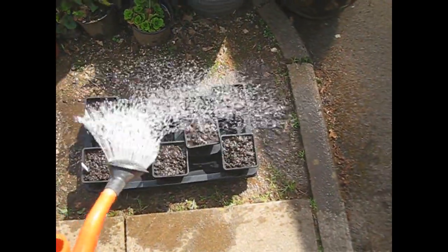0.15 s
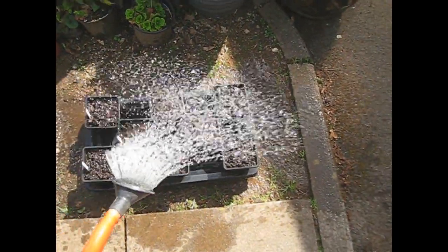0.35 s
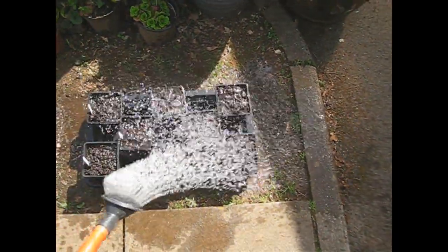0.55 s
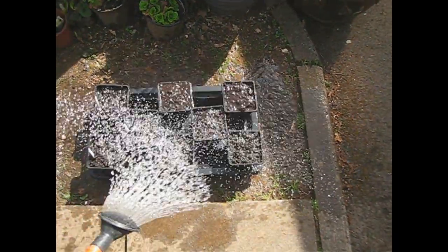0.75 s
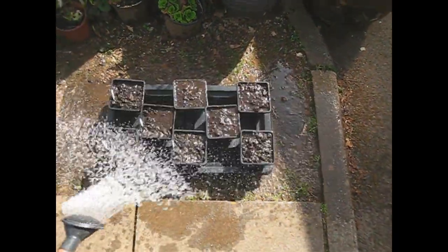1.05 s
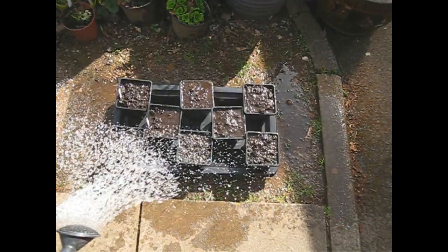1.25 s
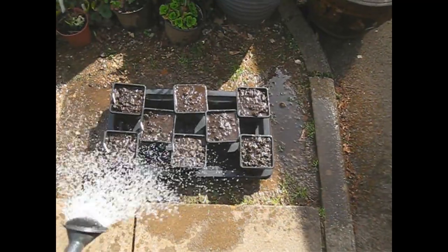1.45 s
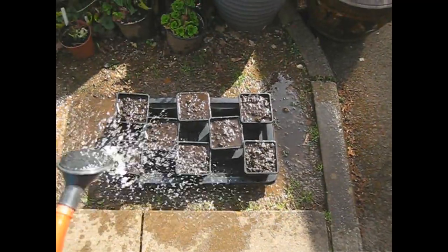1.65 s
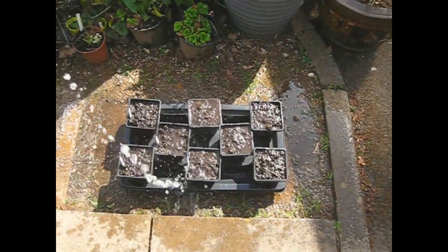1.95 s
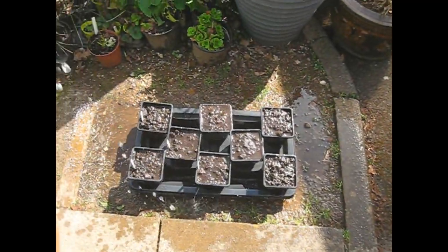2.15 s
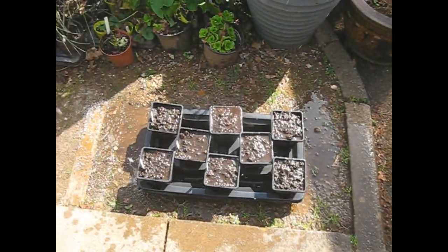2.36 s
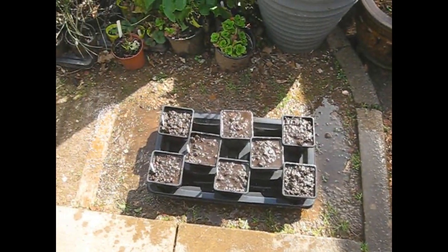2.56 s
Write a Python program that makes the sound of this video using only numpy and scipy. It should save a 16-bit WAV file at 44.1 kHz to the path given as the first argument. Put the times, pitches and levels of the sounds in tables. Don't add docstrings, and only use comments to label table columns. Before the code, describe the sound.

Dense water spray patters on plastic pots and tray in a garden, weakening slightly before stopping; last slugs slap and drip, the emptied can booms softly, and a distant bird trills. Close, dry outdoor pickup.

```python
import sys
import numpy as np
from scipy import signal
from scipy.fft import rfft, irfft
from scipy.io import wavfile
from scipy.ndimage import uniform_filter1d

SR = 44100
rng = np.random.default_rng(int(sys.argv[2]) if len(sys.argv) > 2 else 0)


def boost_factor(decibels):
    exponent = np.asarray(decibels, float) / 20
    return 10 ** exponent


def output_pcm(signal):
    pcm = np.clip(np.atleast_2d(signal).T, -1, 1) * 32767
    wavfile.write(sys.argv[1], SR, np.round(pcm).astype(np.int16))


N = 119070
TIME_S = np.arange(N) / SR


def unit(x):
    return x / np.sqrt(np.mean(x ** 2))


def equalise(x, points):
    hz = np.arange(N // 2 + 1) * SR / N
    point_hz, point_db = np.array(points).T
    gain = boost_factor(np.interp(np.log(hz + 1), np.log(point_hz), point_db))
    return irfft(rfft(x) * gain, N)


def coloured_noise(points):
    return unit(equalise(rng.standard_normal(N), points))


def ring(x, hz, width_hz):
    b, a = signal.iirpeak(hz, hz / width_hz, fs=SR)
    return signal.lfilter(b, a, x)


def walk(rate_hz):
    hold = int(SR / rate_hz)
    steps = rng.standard_normal(N // 100)[np.arange(N) // hold]
    return 1.34 * uniform_filter1d(uniform_filter1d(steps, hold), hold)


def impacts(rate_hz, spread_db):
    chance, side, size = rng.random((N, 3)).T
    landed = chance < rate_hz / SR
    return landed * np.sign(side - .5) * boost_factor(-spread_db * np.log(size + 0.0003))


def splats(rows, sharpness, crack_db, tail_db, sputter_db):
    length = 4096
    out, t = np.zeros(N + length), np.arange(length) / SR
    for start_s, level_db, pitch_hz, decay_ms in rows:
        body, crack, grain = rng.standard_normal((3, length))
        tau = max(decay_ms, .15) / 1000
        flicker = np.interp(t * 700, np.arange(200), grain[:200] ** 2)
        sputter = boost_factor(-sputter_db * flicker * np.minimum(t / 0.005, 1))
        decay = np.exp(-t / tau) + boost_factor(tail_db) * np.exp(-t / (5 * tau))
        env = (1 - np.exp(-t / 0.00035)) * decay * sputter
        hz = min(pitch_hz, 15000)
        y = unit(ring(body, hz, hz / sharpness)) * env
        y = ring(y, hz, 2 * hz / sharpness)
        crack_hz = min(1.23 * hz, 11000)
        y = y + boost_factor(crack_db) * unit(ring(crack, crack_hz, 1.42 * crack_hz)) * env
        i = int(start_s * SR)
        out[i:i + length] += boost_factor(level_db) * y / np.abs(y).max()
    return out[:N]


# freq_hz [Hz], level_db [dB per Hz]
GARDEN_SPECTRUM = [(25, 5.5), (50, 7.5), (111, -4.5), (330, 9.5), (600, -0.5), (2600, -9.5), (8000, -38),
                   (15300, -50)]


def garden():
    return boost_factor(-55.5 + 0.73 * walk(4.2)) * coloured_noise(GARDEN_SPECTRUM)


# start_s [s], length_s [s], pitch_hz [Hz], fall_hz [Hz], level_db [dB], roughness [0 = smooth,
# about 1 = breathy]
BIRD_TRILLS = [
    (2.266, 0.13, 5350, 297, -30, 1.1),
    (2.492, 0.11, 4700, 508, -30, .2),
]


def bird():
    throb_rate_hz = 45.4
    out = 0
    for start_s, length_s, pitch_hz, fall_hz, level_db, rough in BIRD_TRILLS:
        since = TIME_S - start_s
        u = np.clip(since / length_s, 0, 1)
        hz = pitch_hz - fall_hz * (1 - np.exp(-u / 0.132)) + rough * 190 * walk(330)
        throb = .6 - 0.27 * np.cos(2 * np.pi * throb_rate_hz * since)
        breath = 1 - rough + rough * walk(300)
        env = boost_factor(level_db - 9.6 * u) * np.sin(np.pi * u) ** 0.42
        out = out + env * throb * breath * np.sin(2 * np.pi * np.cumsum(hz) / SR)
    return out


# start_s [s], level_db [dB]
CAN_KNOCKS = [
    (2.039, -48.5),
    (2.108, -33),
    (2.363, -54),
]
# freq_hz [Hz], level_db [dB], t60_s [s]
CAN_MODES = [(148, 0, .5), (171, -2, .33), (194, -14, .2)]


def can_boom():
    rise_s = 0.011
    out = 0
    for start_s, level_db in CAN_KNOCKS:
        u = np.maximum(TIME_S - start_s, 0)
        for k, (hz, mode_db, t60_s) in enumerate(CAN_MODES):
            env = boost_factor(level_db + mode_db - 60 * u / t60_s) * (1 - np.exp(-u / rise_s))
            out = out + (-1) ** k * env * np.sin(2 * np.pi * hz * u)
    return out


# start_s [s], peak_db [dB], pitch_hz [Hz], decay_ms [ms]
WATER_SLUGS = [(1.972, -24, 1500, 8), (1.979, -15.5, 2930, 4), (2.008, -10.5, 1160, 3.7),
               (2.025, -21.5, 5800, 28), (2.072, -24, 720, 4.1), (2.0722, -6.5, 2780, 3.8),
               (2.0505, -14.5, 2640, 1.5), (2.449, -21, 2970, 5.4), (2.122, -36, 274, 11),
               (2.24, -29, 1230, 6.2), (2.328, -26, 1800, 14), (2.333, -28, 2600, 5), (2.342, -36, 3100, 4),
               (2.3488, -16.5, 2470, 6.9), (2.349, -25, 1690, 2.5), (2.357, -26, 2600, 2.7),
               (2.364, -17, 2550, 3.6), (2.36, -30, 2050, 9), (2.356, -22, 1170, 13),
               (2.36, -36.5, 370, 15), (2.378, -22, 2650, 5.1), (2.388, -27, 1160, 3),
               (2.398, -29, 940, 2.5), (2.407, -37, 2700, 2.5), (2.492, -21.5, 2070, 12),
               (2.492, -33, 308, 7), (2.493, -32, 1120, 7.8), (2.525, -37, 348, 4.6), (2.52, -43, 95, 9.7),
               (2.661, -20, 2550, 6.4), (2.673, -24.5, 2160, 10), (2.686, -30.5, 1020, 7.3)]


def slops():
    return splats(WATER_SLUGS, sharpness=4.5, crack_db=-7, tail_db=-30.5, sputter_db=3.1)


# start_s [s], peak_db [dB], pitch_hz [Hz], decay_ms [ms]
LAST_DROPS = [(.8388, -9, 8950, 0.89), (1.905, -18, 6100, .8), (1.928, -18.5, 5800, 2.7),
              (1.9355, -22, 9100, 0.91), (1.9785, -13, 7300, 3.8), (1.998, -16, 7500, 0.88),
              (2.0079, -8.5, 4670, 2.4), (2.0176, -8, 8200, 2.4), (2.0505, -11, 9600, 2.2),
              (2.0624, -30, 7600, 1.5), (2.0719, -10, 5000, 0.99), (2.082, -21, 10500, .8),
              (2.103, -10, 9600, 1.4), (2.1157, -6.5, 5330, 1.1), (2.1274, -13, 9700, 2.6),
              (2.141, -9, 10500, 1.35), (2.1577, -23, 6960, 1.5), (2.1812, -10.5, 9500, 2),
              (2.1978, -10.5, 5800, 0.38), (2.2197, -7, 4200, 1.1), (2.2385, -31, 6000, 2),
              (2.2618, -15.5, 9400, 1.5), (2.3224, -26, 10000, 3.1), (2.3288, -26, 5130, 1.3),
              (2.4497, -10, 8100, 3.5), (2.4912, -21.5, 7100, 4.7), (2.5768, -18.5, 10800, 0.44),
              (2.5925, -20.5, 9300, 0.38), (2.6457, -25.5, 9700, 2.7), (2.685, -13, 5630, 5)]


def drips():
    return splats(LAST_DROPS, sharpness=2.44, crack_db=-9, tail_db=-25.5, sputter_db=1.2)


# start_s [s], peak_db [dB], pitch_hz [Hz]
FAT_DROP_TICKS = [(0.0186, -15.5, 11200), (0.041, -21, 10600), (0.061, -31, 11100), (0.0857, -25, 10500),
                  (0.0897, -30, 8020), (0.108, -27, 11900), (0.1253, -12, 10900), (0.145, -13, 11000),
                  (0.1689, -16, 9900), (0.1855, -37, 5600), (0.1862, -9, 8700), (0.2331, -12.5, 8800),
                  (0.2648, -14, 8750), (0.2736, -20, 5670), (0.2885, -8, 8630), (0.3048, -7.5, 8700),
                  (0.3316, -22, 7200), (0.354, -15, 9890), (0.3682, -20, 6700), (0.3676, -14, 9100),
                  (0.397, -7.5, 8620), (0.411, -6.5, 10100), (0.4468, -7.5, 9200), (0.5028, -29, 11800),
                  (0.5247, -8.5, 11300), (0.5816, -28, 11300), (0.582, -13, 12300), (0.5906, -16, 9880),
                  (0.608, -11.5, 10400), (0.6454, -4, 10700), (0.6729, -8, 9200), (0.6774, -8.5, 8750),
                  (0.7637, -24, 10500), (0.7637, -11.5, 8300), (0.7983, -18, 10500), (0.8101, -11.5, 8190),
                  (0.839, -4, 8200), (0.839, -7.5, 8600), (0.856, -4.5, 10900), (0.8774, -22.5, 7600),
                  (0.8879, -17, 9850), (0.8964, -14, 12800), (0.9106, -14, 8800), (0.9418, -26, 5040),
                  (0.9416, -19, 3720), (0.979, -14, 9700), (0.9886, -15.5, 8800), (1.0745, -17.5, 9430),
                   (1.096, -16, 5180), (1.095, -6, 9800), (1.1617, -16.5, 8980), (1.1727, -16, 5750),
                   (1.2122, -10.5, 10600), (1.2312, -15, 9750), (1.2553, -18, 11000), (1.2596, -18, 11900),
                   (1.2751, -21, 9100), (1.3015, -30, 3500), (1.3015, -13, 9860), (1.333, -10, 9100),
                   (1.3649, -24, 9350), (1.397, -13, 10500), (1.4447, -19, 5000), (1.4624, -14, 7400),
                   (1.4801, -33, 3500), (1.4813, -11.5, 5730), (1.5086, -31, 6170), (1.5097, -7, 8900),
                   (1.5449, -16, 5540), (1.5844, -13.5, 8310), (1.607, -9, 11000), (1.647, -8.5, 9100),
                   (1.6707, -23, 8000), (1.671, -5.5, 10000), (1.6931, -19, 10300), (1.7186, -26, 5300),
                   (1.7256, -23, 9000), (1.7516, -18, 3730), (1.766, -16, 7140), (1.8074, -31, 3680),
                   (1.8083, -12, 7500), (1.839, -16, 12400), (1.8488, -20, 9330), (1.8633, -14.5, 9000),
                   (1.9039, -23, 6200)]


def ticks():
    sharpness, spatter_db, spatter_ms = 2.4, -14.5, 1.09
    length = 512
    out, t = np.zeros(N + length), np.arange(length) / SR
    for start_s, level_db, hz in FAT_DROP_TICKS:
        spatter = rng.standard_normal(length) * np.exp(-t * 1000 / spatter_ms)
        push = (t == 0) + boost_factor(spatter_db) * spatter
        y = ring(ring(push, hz, hz / sharpness), hz, hz / sharpness)
        i = int(start_s * SR)
        out[i:i + length] += boost_factor(level_db) * y / np.abs(y).max()
    return out[:N]


# freq_hz [Hz], level_db [dB]
MIST_SPECTRUM = [(900, -19.5), (1600, 1.5), (2700, 1), (5800, 3), (6900, -5.5), (9500, -2), (13000, -5.5),
                 (15300, -5)]


def spray(level_db):
    mist = coloured_noise(MIST_SPECTRUM) * boost_factor(1.2 * walk(26.86) + 2.4 * walk(150))
    crackle = 0
    for hz in (4200, 5800, 8750, 10500, 11600):
        crackle = crackle + ring(ring(impacts(980, 3.6), hz, hz / 3.8), hz, hz / 1.8)
    when, size, pitch, decay = rng.random((450, 4)).T
    start_s, peak_db = when * (N / SR), -3.2 * np.log(size + .05)
    pitch_hz, decay_ms = 6500 + 6000 * pitch, .25 + .9 * decay ** 2
    pops = splats(np.c_[start_s, peak_db, pitch_hz, decay_ms], 3.8, -32, -20, 0)
    return boost_factor(level_db) * (boost_factor(-1.5) * mist + boost_factor(-7) * unit(crackle) + boost_factor(-5.5) * unit(pops))


# freq_hz [Hz], width_hz [Hz], level_db [dB]
POT_MODES = [(346, 128, -14), (619, 222, -4.5), (754, 146, -4), (887, 196, -1.5), (1147, 380, -4.5),
             (1344, 177, -5), (1657, 1050, -3), (2670, 530, -4)]
# time_s [s], level_db [dB]
TRAY_DRIFT = [(.66, -2.5), (.75, 0.5), (.95, -3), (1.03, 3.5), (1.22, 2), (1.9, 2.5)]


def drumming(level_db, hollow_db):
    rim_low_hz, rim_high_hz = 1100, 1500
    tray_db = np.interp(TIME_S, *np.array(TRAY_DRIFT).T)
    common = unit(impacts(2500, 4.5))
    out = 0
    for hz, width_hz, mode_db in POT_MODES:
        x = common + 1.09 * unit(impacts(2000, 2.33))
        shift_db = 0
        if hz < rim_low_hz:
            shift_db = hollow_db
        elif rim_low_hz < hz < rim_high_hz:
            shift_db = -hollow_db
        elif hz > rim_high_hz:
            shift_db = tray_db
        mode = unit(ring(ring(x, hz, width_hz), hz, 1.5 * width_hz))
        out = out + boost_factor(mode_db + shift_db + 0.52 * walk(11.82)) * mode
    return unit(out) * boost_factor(level_db + 1.02 * walk(40.8))


# time_s [s], drumming_db [dB], hollow pots against rims [dB], spray_db [dB]
ROSE_FLOW = [(0, -27.5, -0.5, -34), (.2, -26.5, -3, -34), (.52, -27, -2, -35), (.64, -28.5, 1, -36),
             (.95, -26, 1, -34), (1.15, -29.5, -1, -35.5), (1.5, -29, 0, -33), (1.76, -30, -1, -34.5),
             (1.88, -35, 3, -38), (1.95, -36.5, 0.5, -45), (2.06, -33.5, 0, -53), (2.1, -43.5, -5.5, -40),
             (2.25, -45.5, 4.5, -37), (2.29, -42.5, 0, -47), (2.41, -50.5, 6.5, -44.5),
             (2.53, -47.5, -2, -44.5), (2.63, -51.5, -2, -52.5), (2.67, -59, 5, -44)]


def shower():
    time_s, *columns = np.array(ROSE_FLOW).T
    drum_db, hollow_db, spray_db = (np.interp(TIME_S, time_s, c) for c in columns)
    return drumming(drum_db - 2.5, hollow_db) + spray(spray_db + 1.4)


def reflections(x):
    u = np.arange(3000) / SR
    echo = rng.standard_normal(3000) * boost_factor(-60 * u / 0.055) * (u > .002)
    echo = echo / np.sqrt(np.sum(echo ** 2))
    return boost_factor(-11) * signal.fftconvolve(x, echo)[:N]


def scene():
    water = shower() + ticks() + drips() + slops()
    return (water + reflections(water) + can_boom() + bird() + garden())[None]


# freq_hz [Hz], gain_db [dB]
OVERALL_RESPONSE = [(20, -8), (50, 1), (15200, 0), (15560, -33), (16400, -46)]


def overload_and_response(x):
    return equalise(np.tanh(1.154 * x) / 1.054, OVERALL_RESPONSE)


def band_limit(x):
    return signal.sosfilt(signal.butter(12, 16520, fs=SR, output="sos"), x)


def record(dry):
    mix = overload_and_response(dry)
    return band_limit(mix)


dry = scene()
out = record(dry)
output_pcm(out)
```